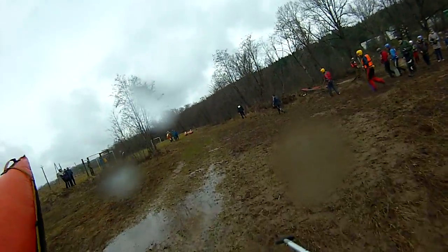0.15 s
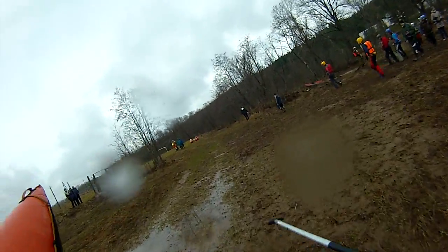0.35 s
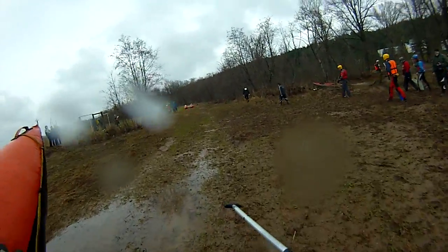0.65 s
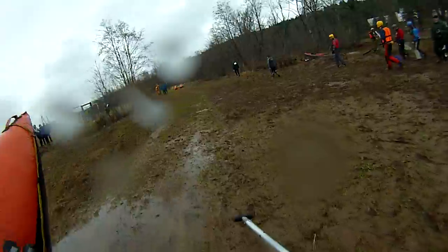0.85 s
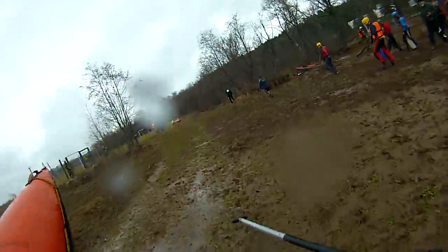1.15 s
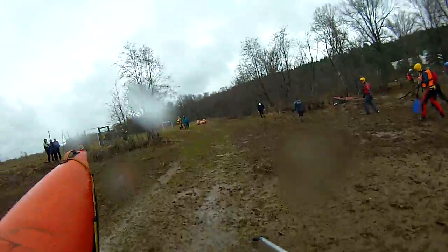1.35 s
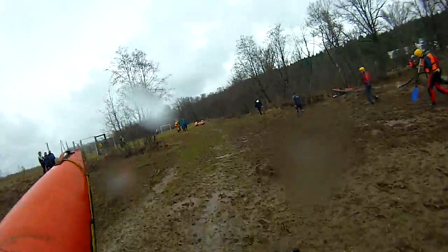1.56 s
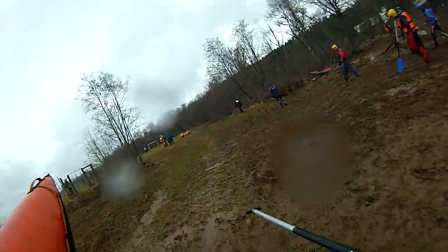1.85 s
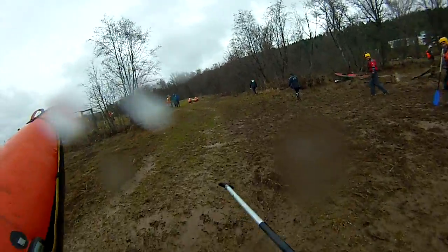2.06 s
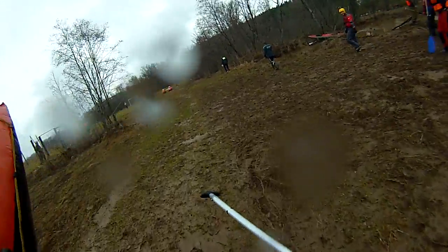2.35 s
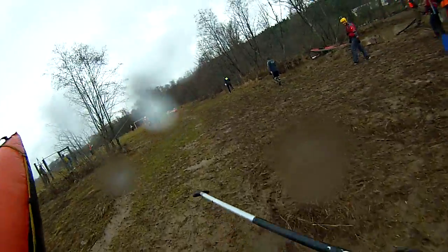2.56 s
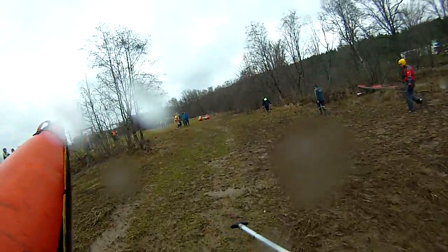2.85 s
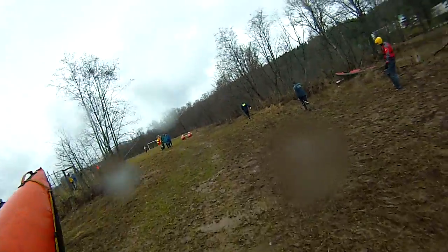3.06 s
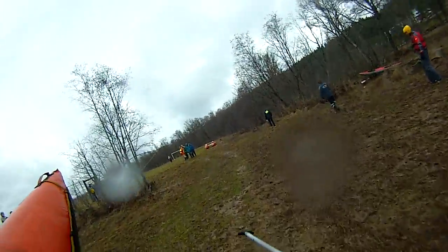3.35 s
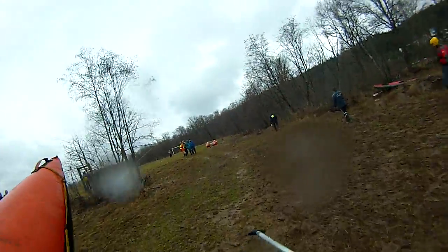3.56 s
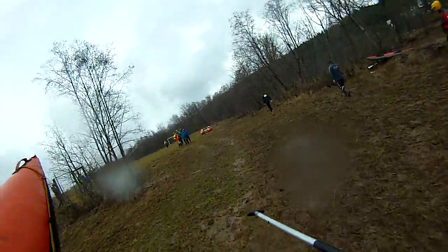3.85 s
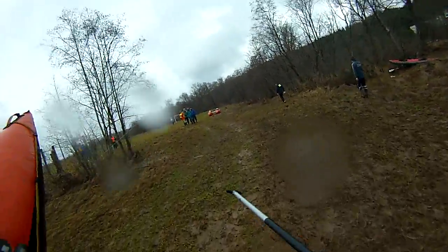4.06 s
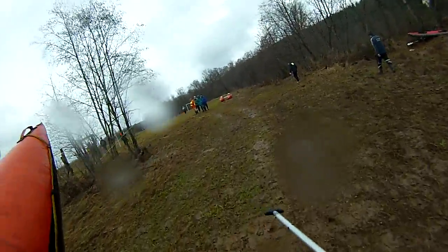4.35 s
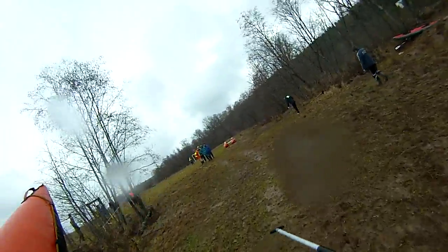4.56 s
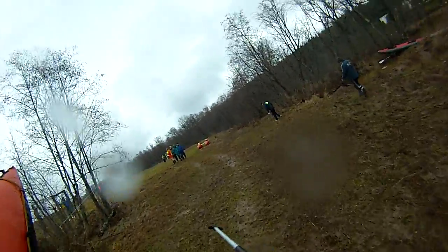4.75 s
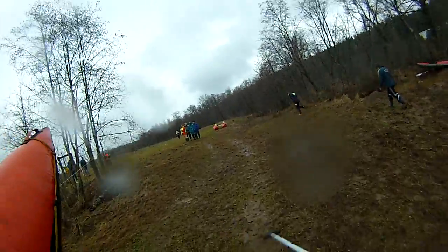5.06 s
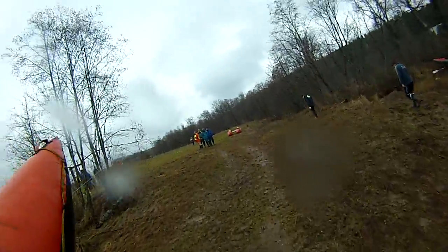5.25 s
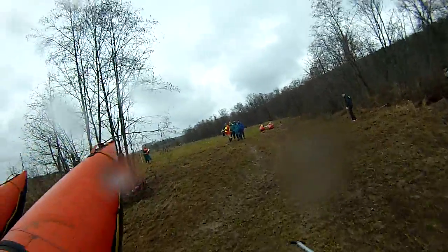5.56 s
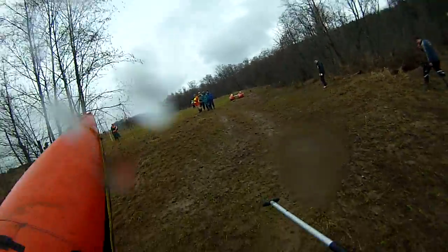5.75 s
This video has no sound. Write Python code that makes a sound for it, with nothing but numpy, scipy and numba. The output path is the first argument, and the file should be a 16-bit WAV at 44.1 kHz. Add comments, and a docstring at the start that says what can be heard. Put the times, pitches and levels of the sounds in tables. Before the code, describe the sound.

Strong wind buffets and overloads a body-worn microphone while running strides thud and the camera housing knocks.

```python
"""Someone runs over a muddy meadow in strong wind, wearing a small camera in a plastic housing.
From the start, about three strides a second swing the microphone through the air and thud through the
mount, while jolts make the housing knock. Near 0.2, 1.6 and 3.8 s strong eddies overload the microphone
and each channel's late, stepwise limiter crackles; weaker ones fall between. A gust peaks near 5.1 s,
and the last stride, near 5.9 s, overloads the microphone again."""
import sys
import numpy as np
from scipy import signal
from scipy.fft import rfft, irfft, next_fast_len
from scipy.io import wavfile
from scipy.ndimage import uniform_filter1d, map_coordinates
from numba import njit

SR = 44100
rng = np.random.default_rng(int(sys.argv[2]) if len(sys.argv) > 2 else 0)


def master(y):
    """Save y as 16-bit WAV."""
    cut = np.clip(np.atleast_2d(y).T, -1, 1)
    pcm = np.round(cut * 32767)  # scale
    wavfile.write(sys.argv[1], SR, pcm.astype(np.int16))


N = 260013
TIME = np.arange(N) / SR

# strides: t/s, relative buffet level/dB, relative thud level/dB, half-width of the swing/s
STRIDES = [(0.197, -5.5, -29.5, 0.045), (0.536, -11.5, -33.5, 0.065), (0.884, -10, -22, 0.078),
           (1.221, -9, -30.5, 0.079), (1.624, -9, -24.5, 0.066), (1.955, -8.5, -22, 0.073),
           (2.317, -11.5, -29, 0.061), (2.665, -10.5, -34.5, 0.067), (3.056, -8, -32, 0.053),
           (3.41, -6.5, -30.5, 0.072), (3.757, -8.5, -22, 0.067), (4.06, -9, -30.5, 0.061),
           (4.433, -13.5, -26, 0.11), (4.756, -7, -20.5, 0.058), (5.138, -13, -34.5, 0.063),
           (5.521, -12.5, -32.5, 0.096), (5.87, -4, -23.5, 0.05)]
# wind between the strides: t/s, relative level/dB
WIND_LEVELS = [(0, -29.5), (.4, -28.5), (1.1, -27), (1.4, -30), (1.8, -26), (2.5, -30.5), (2.85, -27),
               (3.2, -28.5), (3.9, -26), (4.25, -25), (4.5, -22), (4.9, -24), (5.08, -15), (5.27, -24.5),
               (5.45, -27), (5.65, -32.5)]
# overloading eddies: t/s, hold/s, pressure/full scale
OVERLOAD_EDDIES = [(.153, .008, 1.09), (.184, .016, 1.13), (.227, .006, 1.13), (.536, .001, .95),
                   (.903, .004, 1.005), (1.217, .002, 1.001), (1.235, .005, 1.006), (1.598, .009, 1.11),
                   (1.627, .016, 1.15), (1.659, .009, 1.015), (1.996, .011, 1.03), (2.303, .003, 1.06),
                   (3.049, .004, 1.1), (3.382, .001, 1.002), (3.401, .003, 1.007), (3.738, .012, 1.1),
                   (3.762, .02, 1.13), (3.800, .012, 1.06), (4.789, .003, 1.01), (4.823, .002, 1.012),
                   (5.831, .005, 1.02), (5.855, .009, 1.12), (5.881, .008, 1.14)]
# jolts, in relative levels: t/s, mount level/dB, mount pitch ratio, housing level/dB, snap level/dB
CAMERA_JOLTS = [(0.083, -25, 1, -61, -55), (0.169, -10, 1.214, -70, -65),
                (0.528, -25.5, 1.01, -41.5, -30.5), (0.568, -27.5, 1.09, -78.5, -70),
                (0.864, -27, 0.95, -43, -41.5), (0.876, -11, 0.98, -78.5, -68),
                (1.097, -17.5, 1.09, -41.5, -36), (1.199, -25.5, 1.05, -69, -68.5),
                (1.564, -26, 1.05, -59.5, -51.5), (1.616, -16, 1.32, -64, -62),
                (1.779, -16.5, 1.09, -43.5, -33), (2.259, -26, 1.08, -70, -66.5),
                (2.347, -16, 1.24, -40, -38), (2.672, -28.5, 1.03, -60, -58),
                (2.808, -20.5, 1.08, -75, -70), (3.032, -14.5, 0.97, -42.5, -38),
                (3.33, -30, 1.04, -62, -59), (3.672, -26.5, 1.07, -67, -67.5),
                (3.754, -13, 1.2, -61.5, -60.5), (3.848, -24.5, 1.01, -48.5, -45),
                (3.912, -19.5, 1.28, -42, -27), (4.065, -25, 1, -47.5, -30), (4.1, -25, 1.04, -73, -70),
                (4.352, -22.5, 1.12, -62.5, -66), (4.416, -19, 1.24, -46, -43), (4.483, -37, 1.1, -42, -49),
                (4.504, -21.5, 1.08, -66, -70), (4.688, -35, 1.02, -41.5, -36),
                (4.775, -22.5, 1.17, -62.5, -56.5), (5.172, -18.5, 1.05, -40.5, -28),
                (5.358, -33, 0.96, -75, -72), (5.509, -26, 1.38, -54.5, -51),
                (5.765, -31, 0.93, -75.5, -72.5)]
# modes of the mount's low ring and the housing's hollow clack: f/Hz, level/dB, T60/s
MOUNT_MODES = [(117.1, -1, 0.1), (157.4, 3.5, .085), (192.6, 1, 0.085), (242.5, -2, 0.05),
               (350.9, -8.5, 0.028)]
HOUSING_MODES = [(506.8, -8.5, 0.017), (662.4, -0.5, 0.045), (922.7, 3.5, 0.028), (1164, -0.5, 0.033),
                 (1316, 2, 0.014), (1627.4, -13, 0.022), (2747, -15.5, 0.011), (3520, -25, 0.0051)]
# spectral densities of buffeting, footfall, fine turbulence and hiss: f/Hz, relative level/dB
BUFFET_SPECTRUM = [(5, -11), (12, -6), (20, -3), (32, -12), (48, -23), (80, -38.5), (160, -60), (400, -120)]
THUD_SPECTRUM = [(25, -50), (48, -12.5), (68, 4.5), (100, -14.5), (150, -19.5), (250, -42), (500, -53.5),
                 (1500, -110)]
FLUTTER_SPECTRUM = [(60, -22), (125, 0), (180, 5), (280, -5), (400, -9.5), (700, -25), (1300, -41),
                    (4000, -71)]
HISS_SPECTRUM = [(100, -19), (400, 6), (1000, -4), (2000, -6.5), (4200, -11), (6000, -15), (9000, -18),
                 (12500, -26.5), (14000, -55)]


def buffeting(wind, swings):
    """Turbulent pressure: the wind and the swing through the air add in power as a deep rumble."""
    return amp(2.5) * np.hypot(wind, swings) * steady(noise(BUFFET_SPECTRUM), span_s=0.04)


def footfall_thud(wind, treads, shake_db=-15.5):
    """Structure-borne sound: footfalls thud through the mount, which the wind also shakes a little."""
    drive = np.hypot(amp(shake_db) * wind, treads)
    return amp(4.0) * drive * steady(noise(THUD_SPECTRUM), span_s=0.012)


def flutter(swings, treads, lumps_db=3.6, lumps_hz=22):
    """Amplitude modulation: fine turbulence swells with every stride and wavers at random."""
    envelope = amp(-55) + amp(-35.5) * swings + amp(-24) * treads
    lumps = unit(map_coordinates(rng.standard_normal(400), [lumps_hz * TIME]))
    return envelope * amp(lumps_db * lumps) * noise(FLUTTER_SPECTRUM)


def with_eddies(air, edge_s=.0095):
    """Overload: eddies take over the pressure, pushing and pulling in turn; strong ones churn."""
    churn = amp(-15) * noise(FLUTTER_SPECTRUM)
    for k, (start, hold, push) in enumerate(OVERLOAD_EDDIES):
        distance = np.maximum(start - TIME, TIME - start - hold) / edge_s
        grip = np.exp(-np.clip(distance, 0, 4) ** 3)  # rise, hold, release
        eddy = (-1) ** k * push + (push - 1) * churn
        air = air + grip * (eddy - air)
    return air


def jolts():
    """Impact excitation: a jolt rocks the mount and claps the housing on it with a plastic snap."""
    out, t = np.zeros(N + SR), np.arange(SR // 5) / SR
    snap_band = signal.butter(3, [950, 1950], "bandpass", fs=SR, output="sos")
    for start, mount_db, pitch, housing_db, snap_db in CAMERA_JOLTS:
        contact_s = 0.012 * amp(mount_db)  # a heavier jolt makes longer, softer contact
        rock = amp(mount_db - 3.0) * ring(MOUNT_MODES, t * pitch, detune=.04, attack_s=contact_s)
        clack = amp(housing_db + 5.5) * ring(HOUSING_MODES, t, detune=.03, attack_s=0.00049)
        snap = amp(snap_db - 60 * t / 0.026) * signal.sosfilt(snap_band, rng.standard_normal(len(t)))
        out[round((start + .002) * SR):][:len(t)] += rock + clack + snap
    return out[:N]


def ring(modes, t, detune, attack_s, scatter_db=1.6):
    """Modal superposition: damped sines, at slightly new strengths and pitches on each strike."""
    tones = np.zeros(len(t))
    for k, (hz, db, t60) in enumerate(modes):
        level_draw, pitch_draw = rng.standard_normal(2)
        decay = amp(db + scatter_db * level_draw - 60 * t / t60)
        tones += (-1) ** k * decay * np.sin(2 * np.pi * hz * np.exp(detune * pitch_draw) * t)
    return tones * (1 - np.exp(-t / attack_s))


def limiter(x, fall_db, fall_hz, climb_db, climb_hz):
    """Zipper noise: gain steps buzz, high as the limiter ducks and lower as it recovers."""
    size, drift, jitter = rng.standard_normal((3, N))
    # uneven steps at a drifting pace: each crackle is gritty and has its own pitch
    sizes = np.abs(1 + .28 * size)
    drift = unit(uniform_filter1d(drift, size=900))
    jitter = unit(uniform_filter1d(jitter, size=25))
    pace = np.exp(.1 * (drift + jitter))
    fall_pace, climb_pace = np.sqrt(pace) * fall_hz / SR, pace * climb_hz / SR
    gain = limiter_gain(np.abs(x), sizes, amp(-fall_db), fall_pace, amp(climb_db), climb_pace)
    ducked = x * uniform_filter1d(gain, size=2)
    return ducked / (1 + np.abs(ducked / 1.02) ** 24) ** (1 / 24)  # overshoots are rounded off


@njit
def limiter_gain(level, sizes, fall, fall_pace, climb, climb_pace):
    """Delayed feedback: the gain steps down late and too far, then climbs in ever finer steps."""
    lag = 132  # samples
    gain, clock = np.ones(len(level)), 0.0
    for i in range(lag, len(level)):
        overload = level[i - lag] * gain[i - lag] - 1
        if overload >= 0:
            urge = min(1.0, .6 + overload / .2)  # gentler for a slight overload
            clock += urge * fall_pace[i]
            step = fall ** urge
        else:
            clock += gain[i - 1] * climb_pace[i]
            step = climb ** (0.42 + 2.7 * (1 - gain[i - 1]))
        gain[i] = gain[i - 1]
        if clock >= 1:
            clock -= 1
            gain[i] = min(1.0, gain[i] * step ** sizes[i])
    return gain


def sizzle(channels, carrier_hz=12000):
    """Ring modulation: faint sidebands mirror the sound about a carrier, the deepest bass least."""
    thinned = filtered(channels, lambda hz: (15 + 1j * hz) / (700 + 1j * hz))
    return amp(-18.5) * thinned * np.cos(2 * np.pi * carrier_hz * TIME)


def hiss(level_db):
    """Noise floor: a steady broadband hiss."""
    return amp(level_db) * noise(HISS_SPECTRUM)


def swell(centre_s, half_width_s):
    """Power envelope: a rounded, sech-squared rise and fall."""
    return 1 / np.cosh(np.minimum(1.1 * np.abs(TIME - centre_s) / half_width_s, 20)) ** 2


def steady(x, span_s):
    """Envelope division: a noise divided by its smoothed magnitude keeps a nearly even strength."""
    power = np.abs(signal.hilbert(x, next_fast_len(N))[:N]) ** 2
    size = int(span_s * SR)
    smoothed = uniform_filter1d(uniform_filter1d(power, size), size)
    return unit(x / np.sqrt(np.abs(smoothed) + 0.00095))


def noise(spectrum):
    """Spectral shaping: white noise coloured by (f/Hz, level/dB) points on a log axis, at rms 1."""
    f, db = np.transpose(spectrum)
    white = rng.standard_normal(N)
    return unit(filtered(white, lambda hz: amp(np.interp(np.log(hz + 1), np.log(f), db))))


def filtered(x, response):
    """Linear filtering: the spectrum of x times a complex frequency response."""
    size = next_fast_len(N + SR // 2)
    return irfft(rfft(x, size) * response(np.fft.rfftfreq(size, 1 / SR)), size)[..., :N]


def amp(db):
    """Decibel law: level to amplitude ratio."""
    return 10 ** (np.asarray(db) / 20)


def unit(x):
    """Normalisation to rms 1."""
    return x / np.sqrt(np.mean(x ** 2) + 1e-20)


def scene():
    """Superposition: all sources meet at one microphone, which feeds both channels."""
    wind = amp(np.interp(TIME, *np.transpose(WIND_LEVELS)))
    swings = np.sqrt(sum(amp(db) ** 2 * swell(t, width) for t, db, _, width in STRIDES))
    treads = np.sqrt(sum(amp(db) ** 2 * swell(t, half_width_s=0.058) for t, _, db, _ in STRIDES))
    rumble = buffeting(wind, swings) + footfall_thud(wind, treads)
    rumble = .88 * np.tanh(rumble / .88)  # saturates just under full scale
    air = rumble + flutter(swings, treads)
    pressure = with_eddies(air) + jolts() + hiss(-64.5)
    return np.array([pressure, pressure])


def record(dry):
    """Limiting and filtering: a limiter per channel, a bass cut on the right, a treble dip and cutoff."""
    bass_cut_hz, top_hz = 280, 15600
    dip_db, dip_hz, width_hz = -9, 6100, 800
    left, right = [limiter(x, fall_db=0.6043, fall_hz=4101, climb_db=0.307, climb_hz=1946.5) for x in dry]
    right = filtered(right, lambda hz: 1j * hz / (bass_cut_hz + 1j * hz))
    channels = np.array([left, right])
    self_noise = np.array([hiss(-66), hiss(-66)])
    dip = lambda hz: amp(dip_db * np.exp(-((hz - dip_hz) / width_hz) ** 2))
    return filtered(channels + sizzle(channels) + self_noise, lambda hz: dip(hz) * (hz < top_hz))


dry = scene()
out = record(dry)
master(out)
```